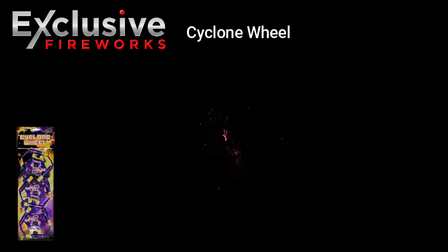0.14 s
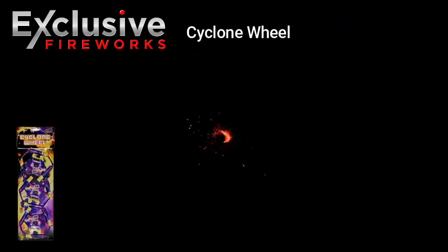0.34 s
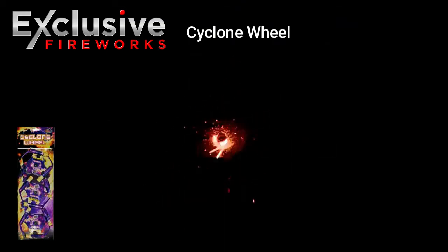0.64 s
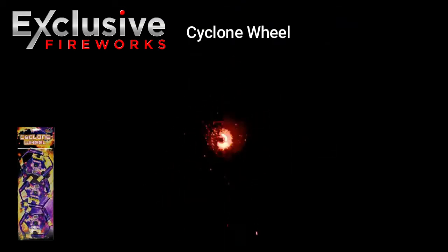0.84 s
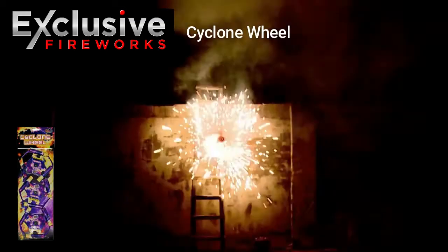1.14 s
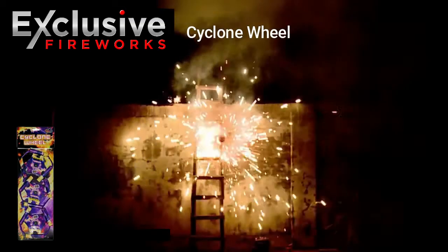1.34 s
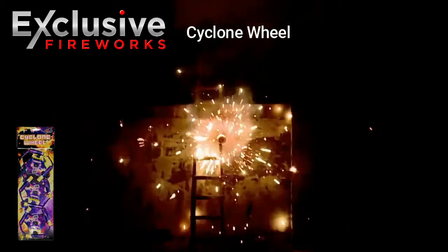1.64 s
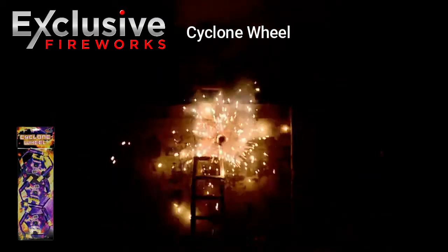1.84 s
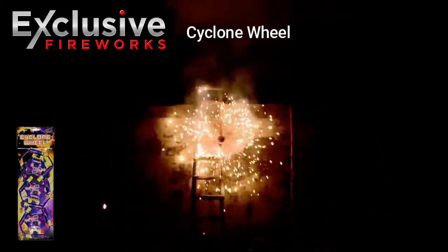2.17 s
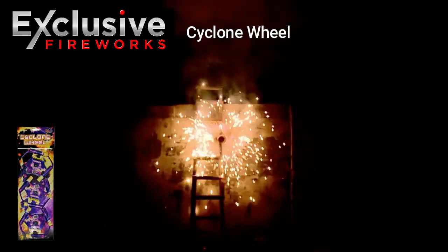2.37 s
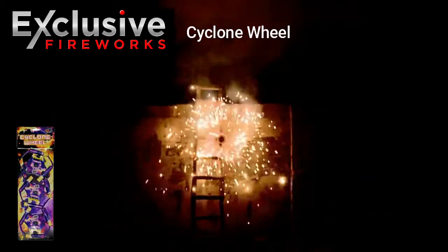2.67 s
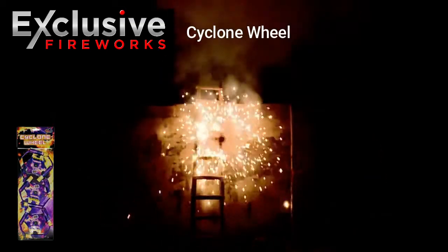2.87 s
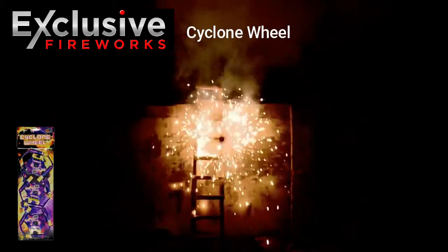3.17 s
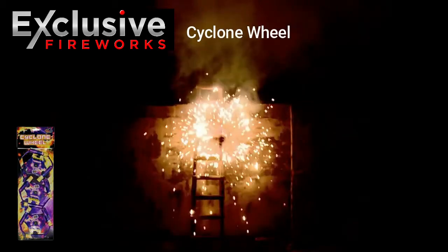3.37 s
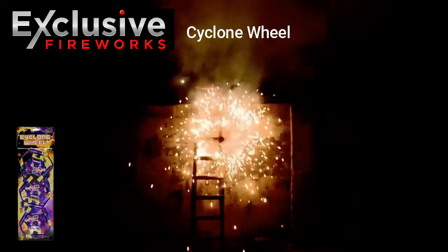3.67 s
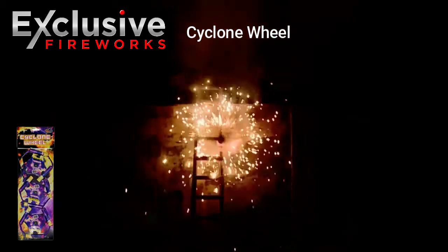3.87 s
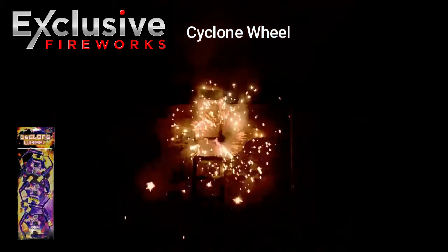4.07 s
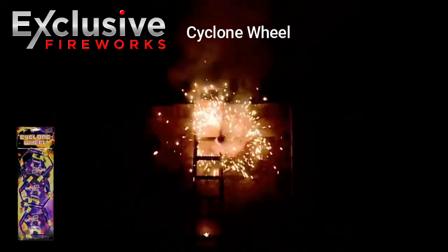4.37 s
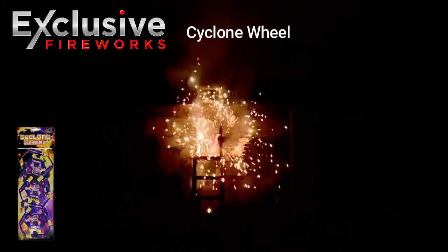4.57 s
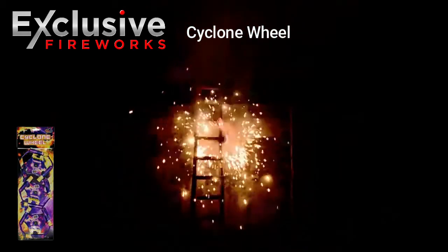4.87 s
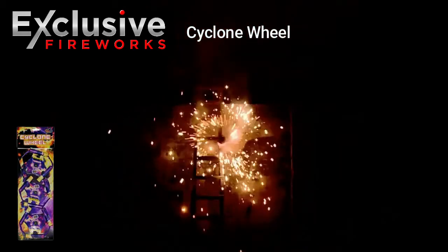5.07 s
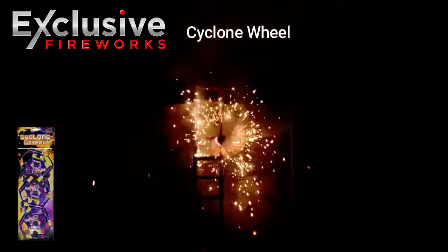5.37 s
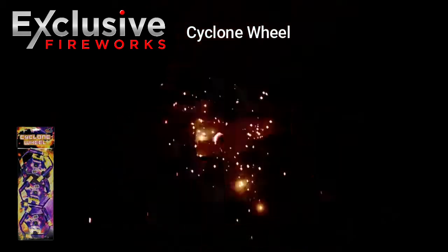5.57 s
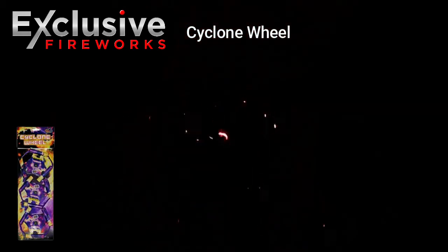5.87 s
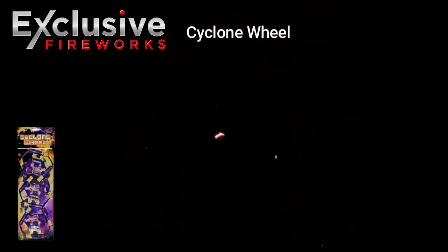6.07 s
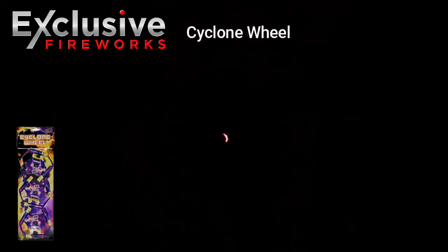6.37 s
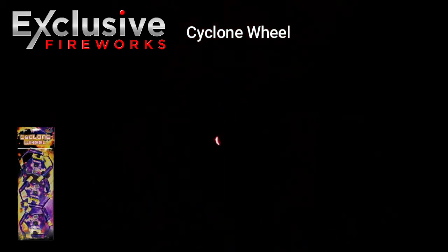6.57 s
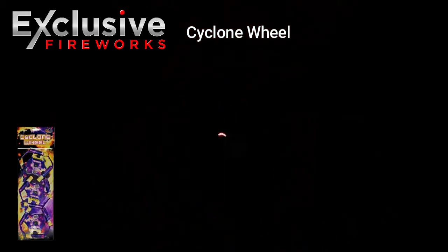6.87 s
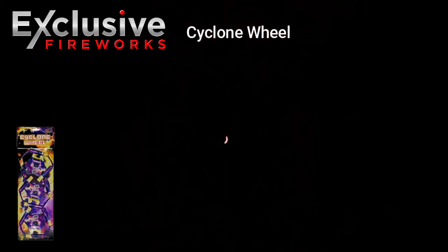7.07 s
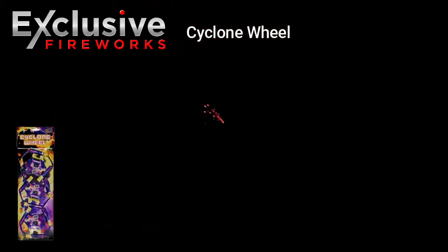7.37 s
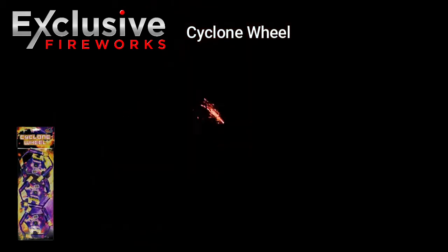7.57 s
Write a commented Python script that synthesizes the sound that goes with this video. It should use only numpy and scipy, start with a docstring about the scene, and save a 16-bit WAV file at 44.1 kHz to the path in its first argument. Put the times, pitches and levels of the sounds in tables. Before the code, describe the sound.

Outdoors at night beside a wall, a small spinning firework wheel starts with a slightly dull, steady hiss and low flame roar. From 0.5 s it sinks, with tiny spark pops, almost dropping out near 0.9 s. A loud, dry bang at 1.1 s brings back bright, grainy fizz with a faint rotating throb. Weaker cracks land around 1.5 and 2.5 s; hard bangs at 3.4 and 3.8 s, lesser ones at 4.1 s, all slapping back off the wall with short reverberation. A quick rattle of pops runs 5.1-5.35 s, then a strong bang at 5.6 s. The hiss dips and turns muffled; a dense cluster of loud bangs bursts at 6.4-6.75 s. Faint pops and sputter die away, with a sharp last tick near 7.46 s. Distant low rumble swells throughout. Sound cuts briefly at 7.47 s, then quiet night air and one faint thud at 7.6 s.

```python
"""A firework wheel spins on a post outdoors at night: its jets are shaped noise, hissing and spitting sparks.
Crackers go off near and far as pressure pushes with a ringing recoil, each thrown back by a wall.
Low filtered noise is the rumble of distant fireworks over the town.
Near the end the sound mutes for an instant; then only the quiet night is left, with one far thud."""
import sys
import numpy as np
from scipy import signal
from scipy.io import wavfile
from scipy.ndimage import uniform_filter1d

SR = 44100
rng = np.random.default_rng(int(sys.argv[2]) if len(sys.argv) > 2 else 0)


def wrap_up_sound(samples):
    """Save the sound to the file named by the first command line argument, as 16-bit audio."""
    columns = np.atleast_2d(samples).T
    # keep every value between -1 and 1, then stretch to whole-number steps
    tamed = np.clip(columns, -1, 1)
    steps = np.round(tamed * 32767).astype(np.int16)
    wavfile.write(sys.argv[1], SR, steps)


N = 340452  # samples


def gain_of(db):
    """Level: the amplitude ratio of a value in dB."""
    return 10 ** (np.asarray(db) / 20)


def unit_rms(x):
    """Normalisation: scales a signal to rms 1."""
    return x / np.sqrt(np.mean(x ** 2) + 1e-20)


def read(points, hz):
    """Spectral envelope: interpolates a table along a logarithmic frequency axis."""
    f, value = np.transpose(points)
    return np.interp(np.log(hz + 1), np.log(f + 1), value)


def curves(rows, t):
    """Temporal envelope: interpolates each column of a table linearly in time."""
    s, *columns = np.transpose(rows)
    return [np.interp(t, s, column) for column in columns]


def patches_of(x, bins, frames):
    """Correlation: smooths random values over frequency and time into patches of rms 1."""
    over_frequency = uniform_filter1d(x, size=bins, axis=0)
    return unit_rms(uniform_filter1d(over_frequency, size=frames, axis=1))


def noise(tone, band_hz, field_db, patchy_db, size):
    """Random short-time spectra with drifting patches; rms 1 inside band_hz before field_db and the patches."""
    hop = size // 4
    hz = np.fft.rfftfreq(size, 1 / SR)[:, None]
    t = np.arange(N // hop + 5) * hop / SR
    real, imaginary, patches = rng.standard_normal((len(t), len(hz), 3)).T
    patches = patches_of(patches, bins=6, frames=10)
    gain = gain_of(read(tone, hz))
    inside = gain[(hz >= band_hz[0]) & (hz < band_hz[1])]
    level = gain_of(field_db(hz, t) + patchy_db * patches)
    spectra = (real + 1j * imaginary) * gain * level
    spectra = spectra / np.sqrt(3 * np.sum(inside ** 2))
    return signal.istft(spectra, nperseg=size, noverlap=size - hop)[1][:N]


def ring(modes, t):
    """Modal decay: damped sines swing out from rest at t = 0."""
    t = np.maximum(t, 0)
    return sum(gain_of(db - 60 * t / t60) * np.sin(2 * np.pi * hz * t) for hz, db, t60 in modes)


def dulled(x, hz):
    """Treble loss: a second-order low-pass."""
    return signal.lfilter(*signal.butter(2, np.clip(hz, 50, 20000), fs=SR), x)


def add(mix, s, sound):
    """Superposition: sums a sound into the mix from time s."""
    part = mix[round(s * SR):][:len(sound)]
    part += sound[:len(part)]


# Burn of the wheel's jets: t/s, hiss level/dB before tilt and dulling, dullness [0-1], flame roar level/dB
JET_BURN = [(0.0, -36.5, .25, -38), (0.16, -34.5, .3, -35.5), (0.5, -38.5, .3, -43),
            (0.64, -43.5, 0.28, -47.5), (0.89, -54.5, .1, -46), (1.08, -43, 0, -48), (1.3, -35, 0, -38.5),
            (1.72, -34, 0.04, -35.5), (1.93, -37, 0.06, -37), (2.29, -39, 0.03, -43.5),
            (2.87, -39, 0.03, -44.5), (3.37, -38, 0.04, -44.5), (3.53, -35.5, 0.33, -39),
            (3.93, -37, 0.14, -36), (4.51, -34.5, 0.24, -37), (4.9, -37.5, 0, -41.5),
            (5.62, -37.5, 0, -38.5), (5.76, -49, 0.45, -39), (6.02, -37.5, 0.92, -39.5),
            (6.36, -34.5, 1, -38), (6.55, -37, 0.6, -37), (6.86, -45.5, 0.43, -35), (7.08, -49, 0.7, -41),
            (7.37, -53, 0.8, -43.5), (7.44, -42.5, 0.85, -39.5)]
# Spectral density of the hiss burning bright: f/Hz, level/dB per Hz
BRIGHT_HISS = [(1000, -40), (1700, -7), (1820, -16), (1900, -24), (2150, -9), (2850, -8.5), (3100, -7),
               (3990, -4.5), (4600, -0.5), (5290, -0.5), (6380, -5.5), (8380, -1), (10000, 0),
               (14700, -8.5), (16000, -16)]
# Spectral density of the sputter burning dull: f/Hz, level/dB per Hz
DULL_SPUTTER = [(1000, -30), (1700, -6), (1850, -24), (2690, -9), (4180, -20), (5190, -4.5), (7210, -2.5),
                (7920, -8), (12800, -15.5), (14200, -27), (15600, -38), (16000, -77)]
# Spectral density of the flame's roar: f/Hz, level/dB per Hz
FLAME_ROAR = [(180, -17.5), (300, -7.5), (434, -5), (635, -11), (1350, -3), (1570, -9.5), (1930, -21.5),
              (2230, -18.5), (3500, -21.5), (4550, -20.5), (7700, -120)]
SPIN_HZ, THROB_RMS_DB = 13, 0.06  # turns a second, and the throb as the jets swing by
BRIGHT_TILT_DB, DULL_TILT_DB = 1.5, -0.5  # per octave above 6 kHz
CRACKLE_PER_S = 600


def jets():
    """Turbulent jet noise: hiss with a slight throb of rotation, sputter when dull, flame roar, fine crackle."""
    def hiss_db(hz, t):
        level, dull, _ = curves(JET_BURN, t)
        dull = np.clip(dull, 0, 1)
        wander = np.cumsum(rng.standard_normal(len(t))) * .03  # the throb's phase drifts, in rad
        throb = THROB_RMS_DB * np.sqrt(2) * np.sin(2 * np.pi * SPIN_HZ * t + wander)
        flicker = unit_rms(uniform_filter1d(rng.standard_normal(len(t)), size=2))
        flicker = (1.35 + 1.15 * dull) * flicker
        octaves = np.clip(np.log2((hz + 1) / 6000), 0, 1.5)
        tilt = (BRIGHT_TILT_DB * (1 - dull) + DULL_TILT_DB * dull) * octaves
        dulling = dull * (read(DULL_SPUTTER, hz) - read(BRIGHT_HISS, hz) - 2.5)
        return with_tails(level + dulling + tilt + throb + flicker, t, TAIL_HISS_DB)

    def roar_db(hz, t):
        return with_tails(curves(JET_BURN, t)[2], t, TAIL_ROAR_DB)

    height = gain_of(4.5 * np.minimum(rng.exponential(1, N), 4))
    crackle = height * (rng.random(N) < CRACKLE_PER_S / SR)
    grain = 1 + 0.065 * unit_rms(uniform_filter1d(crackle, size=20))
    hiss = noise(BRIGHT_HISS, (4000, 8000), hiss_db, patchy_db=2.0, size=512) * unit_rms(grain)
    roar = noise(FLAME_ROAR, (600, 1700), roar_db, patchy_db=3.0, size=512)
    return hiss + roar


# Sparks popping as a jet dies: t/s, level/dB
SPARK_POPS = [(0.5397, -28), (0.596, -28), (0.6533, -27), (0.6739, -31), (0.7042, -26), (0.723, -24),
              (0.7899, -23.5), (6.9522, -26), (7.0481, -28), (7.1637, -29), (7.3088, -33), (7.3228, -33),
              (7.3514, -44), (7.4029, -23), (7.4174, -37), (7.426, -29), (7.4394, -36), (7.4598, -16)]
# Modes of one pop: f/Hz, level/dB, t60/s
SPARK_MODES = [(1300, -3.5, 0.0069), (5530, -5.5, 0.0016), (7000, -8, 0.0025), (10500, -24, 0.0025)]


def sparks():
    """Impulse response: each tiny bright pop excites the same short modes."""
    s, db = np.transpose(SPARK_POPS)
    impulses = np.zeros(N)
    np.add.at(impulses, np.round(s * SR).astype(int), gain_of(db))
    pops = signal.oaconvolve(impulses, ring(SPARK_MODES, np.arange(1000) / SR))[:N]
    return dulled(pops, hz=10000)


# Near crackers: t/s, blast level/dB, wall echo level/dB relative to the blast, size [factor on time]
NEAR_BLASTS = [(1.135, -2, -3.5, 0.87), (3.3867, -2.5, -7, 0.95), (3.8414, -3.5, -6, 0.95),
               (5.6043, -2, -6, 0.94), (6.43, -1.5, -8, 0.95), (6.4724, -2, -10, 0.96),
               (6.5742, -2, -10, 0.98), (6.6578, -1.5, -5.5, 0.96), (6.6703, -6, -7, 0.78),
               (6.7271, -3.5, -9, 0.97)]
# Modes of the recoil, before size and random spread: f/Hz, level/dB, t60/s
NEAR_MODES = [(125.7, -11.5, 0.068), (295.5, -0.5, 0.019), (478, -15, 0.026), (1247, 0.5, 0.0086),
              (2580, -27.5, 0.021), (5050, -13, 0.0041)]
NEAR_WALL_S = .0165  # delay to the nearest facet, before its random shift
GROUND_S, GROUND_DB = 0.00345, -8.5  # ground bounce, the delay before scaling by size


def near_crackers():
    """Blast and reflection: a square push of air, a ringing recoil, a ground bounce, a ragged wall echo."""
    out = np.zeros(N)
    draws = rng.random((len(NEAR_BLASTS), 3, 8))
    for (s, db, echo_db, scale), (late, strength, spread) in zip(NEAR_BLASTS, draws):
        t = np.arange(4000) / SR / scale
        modes = [(hz * (1 + 0.16 * (u - .5)), level, t60) for (hz, level, t60), u in zip(NEAR_MODES, spread)]
        push = 0.92 * (t < .0006) * np.exp(-t / 0.0015)
        blast = dulled(ring(modes, t - .0006) - push, hz=7300)
        back = .5 * blast + dulled(blast, hz=730)
        add(out, s, gain_of(db) * blast)
        add(out, s + GROUND_S * scale, gain_of(db + GROUND_DB) * dulled(blast, hz=920))
        for k, (delay, gain) in enumerate(zip(late, strength)):
            place = NEAR_WALL_S + .0027 * (k + delay)  # facets of the wall lie one behind another
            # later echoes take a random sign, so the low push does not build up
            sign = 1 if k < 2 or gain > .4 else -1
            facet = sign * gain_of(db + echo_db - 1.44 * k) * (.5 + .5 * gain)
            add(out, s + place, facet * back)
    return out


# Each near cracker leaves a short tail of hiss and roar
TAIL_HISS_DB, TAIL_ROAR_DB = -26, -22  # relative to the blast level, before the decay
TAIL_RISE_S, TAIL_T60_S = 0.021, 0.29


def with_tails(db, t, tail_db):
    """Incoherent addition: sums in power one quick swell and decay after every near cracker."""
    s, blast_db = np.transpose(NEAR_BLASTS)[:2, :, None]
    late = np.maximum(t - s, 0)
    swell = np.minimum(late / TAIL_RISE_S, 1)
    tails = swell * gain_of(blast_db + tail_db - 60 * late / TAIL_T60_S)
    return 10 * np.log10(gain_of(db) ** 2 + (tails ** 2).sum(axis=0))


# Far crackers: t/s, blast level/dB, wall echo level/dB relative to the blast
FAR_BLASTS = [(0.9235, -26.5, -22), (.95, -28.5, -10), (1.4836, -8.4, -5), (1.5626, -19, -1),
              (1.6153, -23.5, -9), (2.4745, -7, -4), (3.011, -22, -9), (3.8085, -17.5, -2.5),
              (4.0713, -10, -4.5), (4.264, -20, 0), (5.0995, -8, -4.5), (5.1442, -7.5, -5),
              (5.185, -7.5, -6.5), (5.2223, -10.5, -0.5), (5.2735, -9.5, -1), (5.3023, -11.5, -3.5),
              (5.3424, -9, -3.5), (6.028, -19, 2), (6.9005, -23.5, 4), (6.9994, -28.5, 6),
              (7.0801, -20.5, 2), (7.0944, -25.5, 5.5), (7.152, -23.5, -3), (7.1729, -27, -6)]
# Modes of the slow recoil: f/Hz, level/dB, t60/s
FAR_MODES = [(154, -0.5, 0.018), (1233, -13, 0.009)]
FAR_WALL_S = .0162  # echo delay


def far_crackers():
    """Propagation: a rounded push, its ground bounce, a slow recoil; the wall returns one duller, altered echo."""
    out, t = np.zeros(N), np.arange(2000) / SR

    def push(at):
        return np.sin(np.pi * np.clip((t - at) / 0.000663, 0, 1) ** 0.74)

    recoil = ring(FAR_MODES, t - .0016)
    direct = recoil - push(0) - 0.74 * push(0.000837)
    echo = 1.35 * recoil - push(0) - 0.1 * push(0.00091)
    for s, db, echo_db in FAR_BLASTS:
        air_hz = 6500 * gain_of(0.71 * min(db + 11, 0))  # fainter ones are farther and duller
        add(out, s, gain_of(db) * dulled(direct, air_hz))
        add(out, s + FAR_WALL_S, gain_of(db + echo_db) * dulled(echo, 0.41 * air_hz))
    return out


# Reverberation of the yard: f/Hz, t60/s
YARD_DECAY = [(100, 0.42), (300, 0.54), (800, 0.45), (2000, 0.39), (6000, 0.32)]


def yard(x):
    """Reverberation: sparse taps of random sign, each band decaying at its own rate."""
    taps = np.zeros(SR)
    at = np.arange(300, SR - 20, 20)
    taps[at + rng.integers(0, 20, len(at))] = rng.choice([-1., 1.], len(at))
    hz, t, z = signal.stft(taps, SR, nperseg=256)
    t60 = np.maximum(read(YARD_DECAY, hz), .02)[:, None]
    tail = signal.istft(z * gain_of(-60 * t / t60), SR, nperseg=256)[1]
    return signal.fftconvolve(x, tail / np.linalg.norm(tail))[:N]


# Rumble of far fireworks: t/s, level/dB
RUMBLE_LEVEL = [(0.0, -36), (0.5, -45), (0.95, -39.5), (1.16, -45), (1.39, -32), (1.62, -36), (2.14, -49.5),
                (2.6, -38.5), (2.8, -42), (3.43, -39.5), (3.53, -31), (3.86, -46), (3.99, -35), (4.34, -43),
                (4.88, -40), (5.15, -51), (5.68, -32), (6.3, -40), (6.84, -32), (7.46, -34.5)]
# Spectral density of the rumble: f/Hz, level/dB per Hz
RUMBLE_SPECTRUM = [(12, -49), (20, -19), (43, -4), (169, -2.5), (232, -7.5), (273, -14), (399, -6.5),
                   (585, -14), (634, -14.5), (900, -24.5), (1170, -25), (1980, -120)]


def rumble():
    """Band-limited noise: low and slightly lumpy, its level rising and falling."""
    def level_db(hz, t):
        return curves(RUMBLE_LEVEL, t)[0]

    return noise(RUMBLE_SPECTRUM, (50, 450), level_db, patchy_db=3.5, size=1024)


# Spectral density of the quiet night: f/Hz, level/dB per Hz
NIGHT_SPECTRUM = [(18, -30), (30, -8.5), (184, -10), (280, -22.5), (336, -19), (394, -32), (1390, -34),
                  (2290, -52), (3400, -46), (4800, -42), (5310, -35), (5900, -46), (10500, -39.5),
                  (16000, -48)]
NIGHT_DB = -37
THUD_S, THUD_DB, THUD_HZ, THUD_T60_S = 7.599, -29, 165, .04


def night():
    """Ambient noise: steady and broadband, with one far thud as a damped mode."""
    out = noise(NIGHT_SPECTRUM, (20, 16000), lambda hz, t: NIGHT_DB + 0 * t, patchy_db=2.0, size=1024)
    add(out, THUD_S, -ring([(THUD_HZ, THUD_DB, THUD_T60_S)], np.arange(3000) / SR))
    return out


# Side signal at full width, before patches: f/Hz, level/dB relative to mid
SIDE_LEVEL = [(60, -31), (110, -40), (200, -54), (380, -37.5), (700, -29), (1290, -41.5), (2380, -27.5),
              (4400, -21), (8120, -21.5), (15000, -23)]
MUTE_FROM_S, MUTE_TO_S = 7.466, 7.505


def scene():
    """Superposition and decorrelation: one field, cut by the mute; its stereo width flickers in patches."""
    near, far = near_crackers(), far_crackers()
    reverberation = yard(gain_of(-13.5) * near + gain_of(-12) * far)
    show = jets() + rumble() + sparks() + near + far + reverberation
    t = np.arange(N) / SR
    before = uniform_filter1d(1. * (t < MUTE_FROM_S), size=40)
    after = uniform_filter1d(1. * (t > MUTE_TO_S), size=40)
    mid = show * before + night() * after

    hz, t, z = signal.stft(mid, SR, nperseg=512)
    turn = rng.random(z.shape[::-1]).T  # random phase, in cycles
    patches = patches_of(rng.standard_normal(z.shape[::-1]).T, bins=8, frames=5)
    level, dull, _ = curves(JET_BURN, t)
    brightness_db = with_tails(level - 10.0 * dull, t, TAIL_HISS_DB)
    opening = np.clip((brightness_db + 47.0) / 8.5, 0, 1)  # narrow in the quieter and duller passages
    width = opening * gain_of(read(SIDE_LEVEL, hz)[:, None] + 6.2 * patches)
    side = signal.istft(z * width * np.exp(2j * np.pi * turn), SR, nperseg=512)[1][:N]
    return np.array([mid + side, mid - side])


BASS_CUT_HZ, TREBLE_CUT_HZ, SELF_NOISE_DB = 48, 15800, -72
PORT_HZ, PORT_WIDTH_HZ, PORT_GAIN = 5270, 330, 0.36  # port resonance, its gain added to the direct sound


def record(dry):
    """Transduction: the microphone cuts deep bass, hisses, resonates at its port, saturates and band-limits."""
    heard = signal.lfilter(*signal.butter(2, BASS_CUT_HZ, "high", fs=SR), dry)
    heard = heard + gain_of(SELF_NOISE_DB) * rng.standard_normal(N)  # the same hiss in both channels
    resonance = signal.lfilter(*signal.iirpeak(PORT_HZ, PORT_HZ / PORT_WIDTH_HZ, fs=SR), heard)
    heard = heard + PORT_GAIN * resonance
    soft = 1.162 * np.tanh(heard / 1.055)
    band_limit = signal.firwin(511, TREBLE_CUT_HZ, window=("kaiser", 9), fs=SR)
    return signal.oaconvolve(soft, band_limit[None], "same")


dry = scene()
out = record(dry)
wrap_up_sound(out)
```